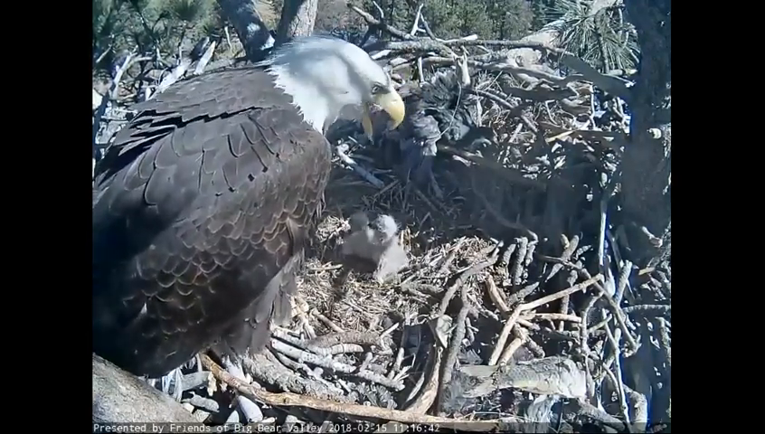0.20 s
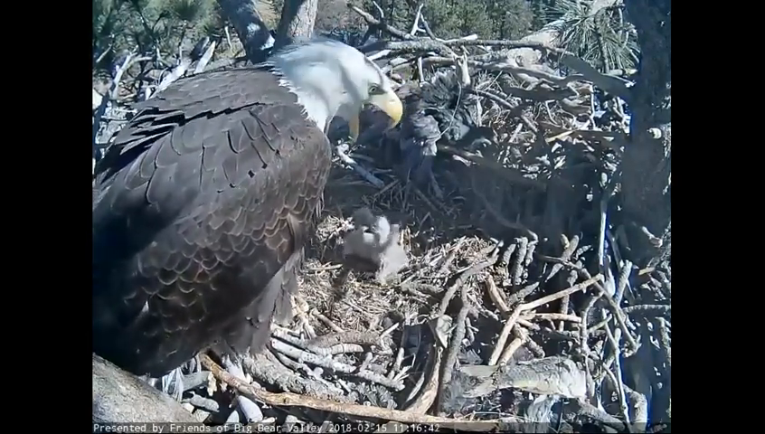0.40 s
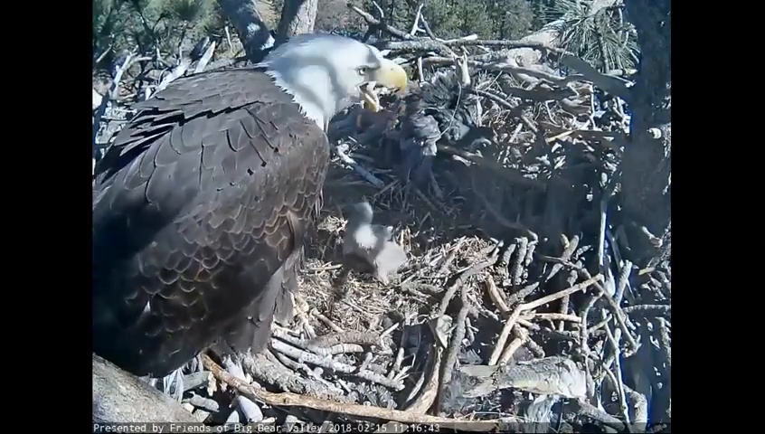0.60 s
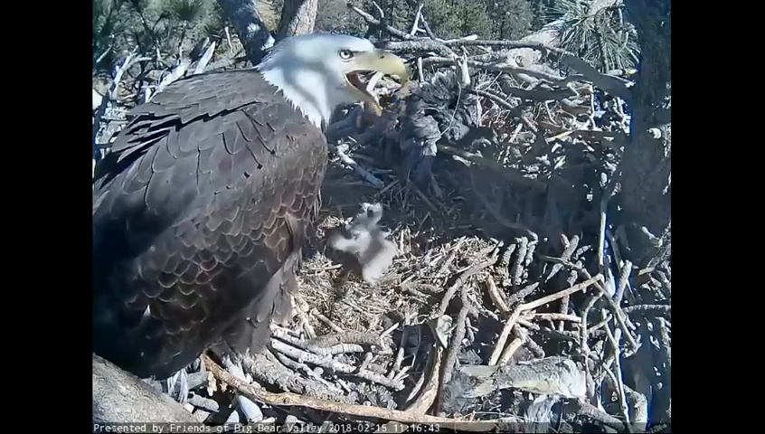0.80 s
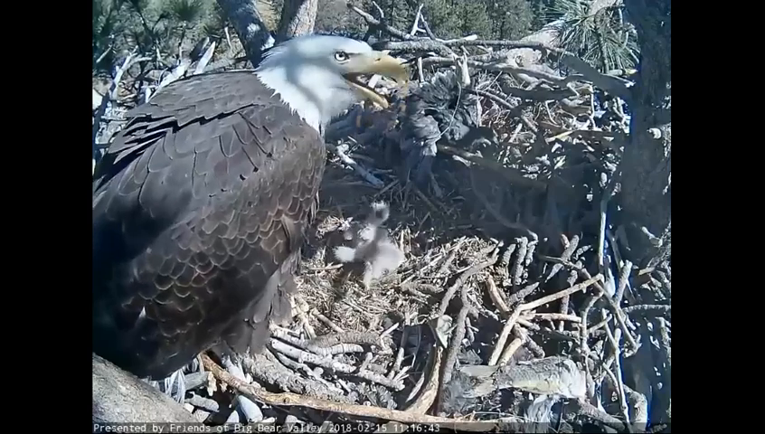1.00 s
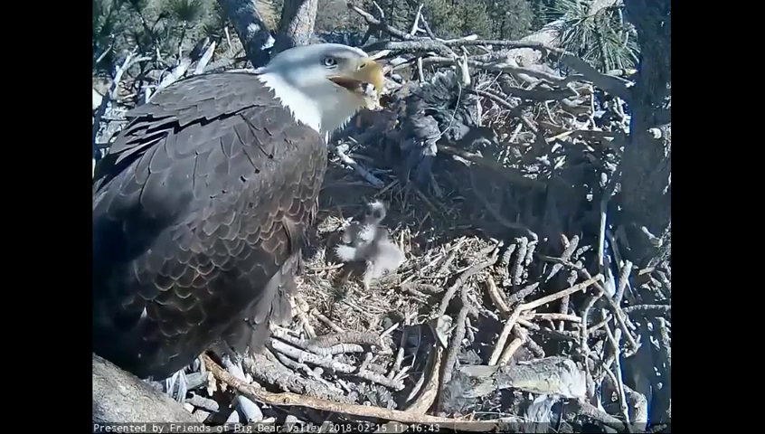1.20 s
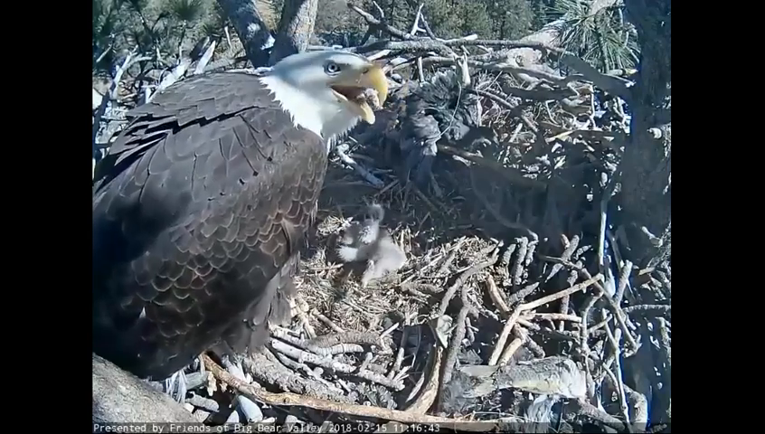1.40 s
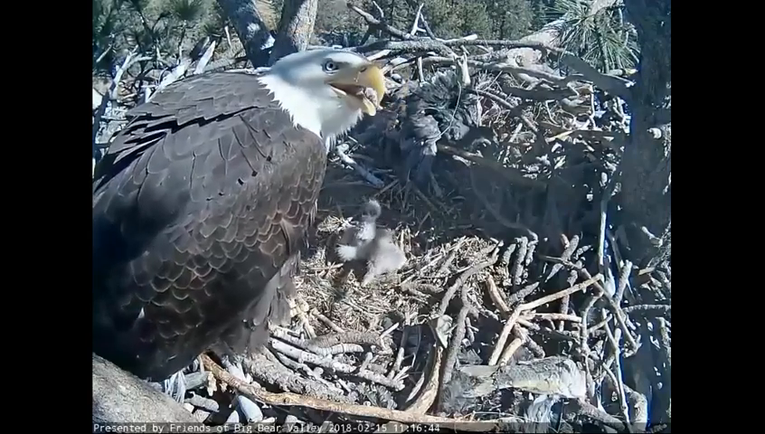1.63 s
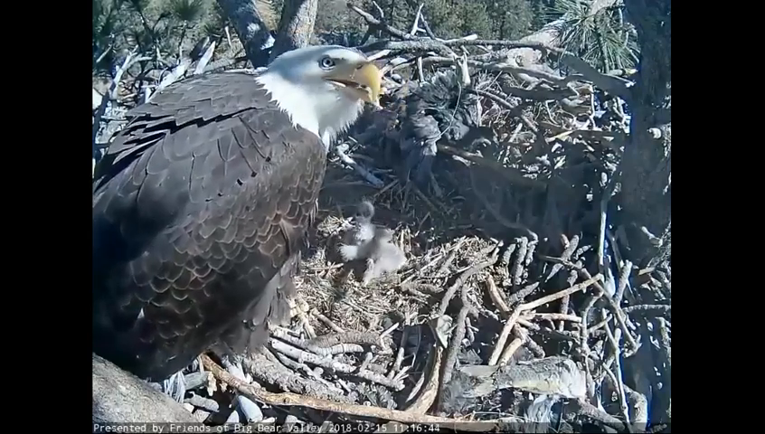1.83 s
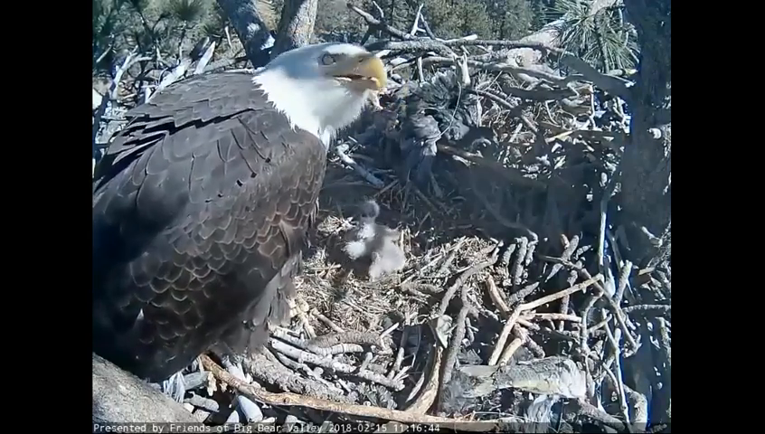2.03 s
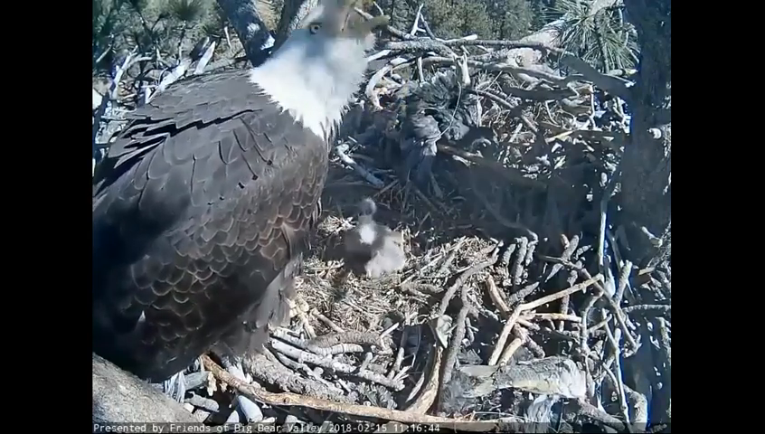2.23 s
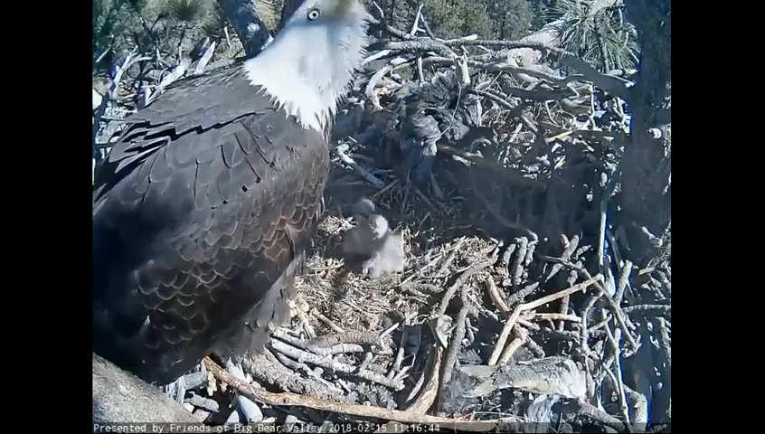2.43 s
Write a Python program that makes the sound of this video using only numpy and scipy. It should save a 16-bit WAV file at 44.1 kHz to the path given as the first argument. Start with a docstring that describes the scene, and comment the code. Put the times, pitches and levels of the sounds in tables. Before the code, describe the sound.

Two eagles call at close range, sharp chitter notes and rising quavering whistles, slightly distorted

```python
"""A forest nest, outdoors: two eagles call close to a narrow-band microphone over rumbling, hissing air.
One holds two long trembling whistles (bent sines with an octave and undertones); the other chitters
short notes (overtone stacks in a sliding band) over and between them. Twigs rustle and thump near the end
(filtered snaps, damped pulses). Blurred noise tails give a near echo and a faint long forest echo.
The loud calls drive a limiter and clip."""
import sys
import numpy as np
from scipy import signal
from scipy.fft import rfft, irfft
from scipy.io import wavfile
from scipy.ndimage import uniform_filter1d, map_coordinates

SR = 44100
rng = np.random.default_rng(int(sys.argv[2]) if len(sys.argv) > 2 else 0)


def to_wav(s):
    """Save 16-bit WAV."""
    ch = np.atleast_2d(s).T  # columns
    pcm = np.round(np.clip(ch, -1, 1) * 32767)  # PCM
    wavfile.write(sys.argv[1], SR, pcm.astype(np.int16))


N = 110250
FOREST_T60_S = 2


def gain_of(db):
    """dB to amplitude gain."""
    return 10 ** (np.asarray(db) / 20)


def evened(x):
    """Scales to rms 1."""
    return x / np.sqrt(np.mean(x ** 2) + 1e-20)


def add(mix, start_s, sound):
    """Mixes a sound in at a time, cut at the end of the mix."""
    part = mix[round(start_s * SR):][:len(sound)]
    part += sound[:len(part)]


def slow_noise(size, cutoff_hz):
    """Low-passed noise of about rms 1; the filter's start-up is dropped."""
    pad = SR // 10
    lowpass = signal.butter(2, cutoff_hz, fs=SR, output="sos")
    return evened(signal.sosfilt(lowpass, rng.standard_normal(size + pad)))[pad:]


def air():
    """Wind rumble and hiss: coloured noise whose spectrum drifts in patches of time and frequency."""
    # colour of the air: hz, relative_level_db
    colour_table = [(12, -20.5), (24, 0), (45, -13), (129, -20.5), (646, -28.5), (1650, -43.5), (1980, -40),
                    (2230, -42.5), (3640, -45), (4000, -75), (5200, -102)]
    level_db, patch_db = -49.5, 0.87
    frames, bin_hz = N // 256 + 5, np.fft.rfftfreq(1024, 1 / SR)
    real, imag, patches = rng.standard_normal((frames, 513, 3)).T
    patches = uniform_filter1d(patches, 8, 0)  # across frequency
    patches = evened(uniform_filter1d(patches, 10, 1))  # across time
    hz, colour_db = np.transpose(colour_table)
    bin_db = np.interp(np.log(bin_hz + 1), np.log(hz + 1), colour_db)
    spectra = (real + 1j * imag) * gain_of(bin_db[:, None] + patch_db * patches)
    noise = signal.istft(spectra, nperseg=1024, noverlap=768)[1][:N]
    return gain_of(level_db) * evened(noise)


def earlier_echo():
    """Dying echo of a whistle that has just ended: a tone blurred by two slow random quadratures."""
    pitch_hz, start_db = 1995, -52
    t = np.arange(N) / SR
    turns = 2 * np.pi * pitch_hz * t
    fade = gain_of(start_db - 30 * t / FOREST_T60_S)  # half the forest echo's dB rate
    return fade * (slow_noise(N, 41) * np.sin(turns) + slow_noise(N, 35) * np.cos(turns))


def chitter_note(start_s, length_s, level_db, first_hz, last_hz, arch_hz, first_band_hz, last_band_hz,
                 width_hz, throb, throbs_per_s, peak_share):
    """Overtones, of which the throat favours one sliding band; swells, fades and may dip in throbs."""
    flutter_hz, flutter, rasp_hz, rasp, jitter = 70, 0.17, 700, 0.11, 0.005
    swell_power, fade_power, dip_power = 0.76, 0.9, 8
    t = np.arange(0, length_s, 1 / SR)
    u, throb = t / length_s, np.clip(throb, 0, 1)
    pitch_hz = first_hz + (last_hz - first_hz) * u + arch_hz * np.sin(np.pi * u)
    band_hz = first_band_hz + (last_band_hz - first_band_hz) * u ** 0.73
    jittered_hz = pitch_hz * (1 + jitter * slow_noise(len(t), flutter_hz))
    turns = 2 * np.pi * np.cumsum(jittered_hz) / SR
    voice = np.zeros(len(t))
    for k in range(1, 8):
        weight = 1 / (1 + ((k * pitch_hz - band_hz) / width_hz) ** 2) ** 2
        shake = 1 + flutter * slow_noise(len(t), flutter_hz) + rasp * slow_noise(len(t), rasp_hz)
        voice += weight * shake * np.sin(k * turns)
    dips = 1 - throb * abs(np.cos(np.pi * throbs_per_s * t)) ** dip_power
    swell = np.sin(np.pi / 2 * np.clip(u / peak_share, 0, 1))
    fade = np.sin(np.pi / 2 * np.clip((1 - u) / (1 - peak_share), 0, 1))
    shape = swell ** swell_power * fade ** fade_power
    return gain_of(level_db) * shape * dips * evened(voice)


def chitter():
    """One bird's short notes."""
    # start_s, length_s, level_db, first_pitch_hz, last_pitch_hz, arch_hz, first_band_hz, last_band_hz,
    # band_width_hz, throb_depth (0-1), throbs_per_s, peak_share (of the length)
    notes = [(0.192, 0.02, -33.5, 578, 607, 0.07, 1400, 2100, 1514, 0.15, 85, 0.33),
             (.196, 0.092, -38, 622, 675, 0.1, 3096, 3300, 410, 0.65, 50, 0.23),
             (0.197, 0.039, -35.5, 1353, 1350, 3, 1390, 1340, 385, .1, 45, 0.27),
             (0.22, 0.055, -23, 596.8, 559.6, 1.7, 2230, 2630, 394, 0.9, 62, 0.16),
             (0.264, 0.034, -22.5, 632, 590, 3, 2370, 2940, 400, 0, 40, 0.36),
             (0.284, 0.08, -5, 727.8, 695, 36, 2970, 3110, 299, .05, 93, 0.13),
             (.388, 0.062, -3.5, 758.8, 742, 14, 2910, 3020, 291, .05, 93, 0.091),
             (0.448, 0.056, -29, 522, 523.6, 3, 2850, 2000, 606, .4, 80, .3),
             (0.483, 0.055, -3, 741.5, 713.4, 23, 2950, 2710, 314, .05, 35, 0.16),
             (0.53, 0.1, -21.5, 521, 528.6, 2.7, 3054, 2400, 600, 0.2, 52, 0.38),
             (0.588, 0.046, -4.5, 712, 740.7, 12, 2965, 3030, 304, 0, 45, 0.1),
             (0.631, 0.065, -26.5, 528.7, 542, 1.6, 2970, 2600, 590, 0.2, 130, 0.086),
             (0.719, 0.05, -9, 747.6, 698.7, 6.6, 3010, 2950, 361, .2, 210, 0.21),
             (.842, 0.044, -10.5, 761, 704, 0.094, 2274, 3300, 450, .85, 29.5, 0.46),
             (0.957, 0.0097, -43.5, 619, 616.5, 1.02, 1530, 2000, 800, 0.7, 102, .3),
             (0.97, 0.049, -8, 750.5, 696, 0.14, 2820, 2850, 336, .8, 26, 0.58),
             (1.132, 0.049, -15.5, 757.3, 702, 0.1, 3580, 2330, 695, 0.6, 95, 0.59),
             (1.291, 0.013, -43.5, 676, 610, 1.8, 1440, 1300, 492, 0.5, 74, 0.26),
             (1.305, 0.038, -13.5, 746.4, 679.6, 0.1, 3208, 1966, 401, 0.3, 69, 0.54),
             (1.439, 0.064, -30, 606, 647, 3.4, 2200, 4800, 2585, 0.3, 73, 0.61),
             (1.602, 0.021, -26, 577, 469, 4.7, 1378, 1620, 800, 0.29, 36, 0.57),
             (1.609, 0.12, -26.5, 532.5, 503, 1.3, 2955, 2830, 600, .7, 110, 0.17),
             (2.178, 0.015, -31, 824, 812, 2.6, 3300, 3300, 291, 0.1, 60, 0.48),
             (2.191, 0.051, -17, 657, 724, 2.8, 2660, 3010, 302, 0.9, 57.8, 0.32),
             (2.226, 0.028, -22, 841, 855, 4, 3450, 3450, 300, 0.7, 86, 0.44),
             (2.238, 0.022, -38, 760, 630, 4, 1460, 1400, 400, .5, 90, 0.34),
             (2.406, 0.094, -41.5, 664, 693, 3.9, 2860, 2750, 294, 0.6, 63, 0.45)]
    out = np.zeros(N)
    for row in notes:
        add(out, row[0], chitter_note(*row))
    return out


def whistle(rows):
    """Trembling tone; its octave swells at the bottom of each tremble, and undertones grow when loud."""
    # brief breaks into thirds of the pitch: peak_s, level_db
    breaks = [(1.84, -36), (1.878, -29), (1.94, -15)]
    break_s, half_db, half_growth = 0.011, -31.5, 1  # half-pitch undertone, db per db of level
    tremble_per_s, tremble_db, wander_hz, breath_db = 44, 0.5, 3.4, -27.5
    octave_db, octave_swing_db, octave_wander_db = -3, 2, 1.5
    s, hz, db, depth_hz = np.transpose(rows)
    t = np.arange(s[0], s[-1], 1 / SR)
    level_db, depth = np.interp(t, s, db), np.interp(t, s, depth_hz)
    depth_share = depth / depth.max()
    shake = np.sin(2 * np.pi * tremble_per_s * (t - s[0]))
    pitch_hz = np.interp(t, s, hz) + depth * shake + wander_hz * slow_noise(len(t), 53)
    turns = 2 * np.pi * np.cumsum(pitch_hz) / SR
    breath = gain_of(breath_db) * slow_noise(len(t), 770)
    swing_db = octave_db - octave_swing_db * shake + octave_wander_db * slow_noise(len(t), 25)
    octave = gain_of(swing_db) * depth_share ** 1.1
    half = gain_of(half_db + half_growth * (level_db - db.max())) * (1 + slow_noise(len(t), 80))
    thirds = sum(gain_of(d) * np.exp(-((t - at) / break_s) ** 2) for at, d in breaks)
    # phase modulation makes the undertones
    bent = turns + breath + 2 * half * np.cos(turns / 2)
    bent += 2 * thirds * (np.cos(turns / 3) + np.cos(2 * turns / 3))
    tone = np.sin(bent) + octave * np.cos(2 * bent)
    return np.sqrt(2) * gain_of(level_db + tremble_db * shake * depth_share) * tone


def whistles():
    """The other bird's two long whistles."""
    # breakpoints per whistle: time_s, pitch_hz, level_db, tremble_depth_hz
    calls = [
        [(.265, 1894, -61.5, 25), (.29, 1877, -25, 49), (.36, 1888, -23.5, 38), (.46, 1930, -18, 26),
         (.56, 1918, -20, 16), (.655, 1951, -15, 7.1), (.7, 1972, -13, 5.6), (.78, 1994, -8, 8.7),
         (.815, 2063, -10, 2), (.835, 2020, -30.5, 2.1), (.885, 1787, -28, 2.3)],
        [(1.385, 1913, -57, 45), (1.4, 1848, -23.5, 37), (1.52, 1894, -21.5, 42.5), (1.62, 1915, -19, 22),
         (1.68, 1939, -16, 9.9), (1.712, 1978, -12.5, 5.3), (1.8, 1993, -7, 1.4), (1.87, 2028, -12, 4.1),
         (1.918, 2004, -4.5, 6.1), (1.93, 1870, -23.5, 5.2), (1.95, 1694, -52.5, 3)],
    ]
    out = np.zeros(N)
    for rows in calls:
        add(out, rows[0][0], whistle(rows))
    return out


def twigs():
    """Twigs: a spray of tiny band-passed snaps and a few dull knocks, each with a short damped tick."""
    # start_s, length_s, level_db
    rustles = [(2.262, 0.059, -36.5)]
    # start_s, level_db
    thumps = [(2.261, -29), (2.301, -24), (2.316, -27), (2.33, -27.5)]
    snaps_per_s, thump_ms, tick_db, tick_hz, tick_ms = 600, 1.5, -7, 1500, 2.4
    out = np.zeros(N)
    bandpass = signal.butter(2, [2300, 3700], "band", fs=SR, output="sos")
    for start_s, length_s, level_db in rustles:
        t = np.arange(0, length_s, 1 / SR)
        snaps = (rng.random(len(t)) < snaps_per_s / SR) * rng.standard_normal(len(t))
        snaps = evened(signal.sosfilt(bandpass, snaps))
        add(out, start_s, gain_of(level_db) * snaps * np.sin(np.pi * t / length_s))
    ms = np.arange(900) / SR * 1000
    u = ms / thump_ms
    knock = np.e * u * (1 - u / 3) * np.exp(-u)
    tick = gain_of(tick_db) * np.sin(2 * np.pi * tick_hz * ms / 1000) * np.exp(-ms / tick_ms)
    for start_s, level_db in thumps:
        add(out, start_s, gain_of(level_db) * (knock + tick))
    return out


def echo(x, near_db, far_db):
    """Adds a short blur from nest and trunk and a long forest tail: decaying noise as echo taps."""
    near_t60_s, far_rise_s = 0.091, 0.14
    t = np.arange(2 * SR) / SR
    near = rng.standard_normal(len(t)) * gain_of(-60 * t / near_t60_s)
    far = rng.standard_normal(len(t)) * gain_of(-60 * t / FOREST_T60_S)
    far *= np.clip(t / far_rise_s, 0, 1)
    taps = gain_of(near_db) * near / np.linalg.norm(near) + gain_of(far_db) * far / np.linalg.norm(far)
    return x + signal.fftconvolve(x, taps)[:N]


def scene():
    """Both birds and the twigs with their echoes, over the air."""
    background = air() + earlier_echo()
    near_nest = echo(chitter() + twigs(), near_db=-7, far_db=-22.5)
    whistler = echo(whistles(), near_db=-19, far_db=-38)
    return (background + near_nest + whistler)[None]


def limiter(x):
    """Instant-attack limiter: holds power peaks, lets them fall steadily, removes most of the excess."""
    limit_db, limit_share, recover_db_per_s = -12, 0.92, 877
    power_db = 10 * np.log10(abs(uniform_filter1d(x ** 2, 90)) + 1e-12)
    fall_db = np.arange(N) * recover_db_per_s / SR
    held_db = np.maximum.accumulate(power_db + fall_db) - fall_db
    over_db = np.maximum(held_db - limit_db, 0)
    return x / gain_of(limit_share * uniform_filter1d(over_db, 40))


def narrow_band(x):
    """Samples at a low rate, folding overtones back, then dulls the treble and cuts above a band edge."""
    narrow_rate_hz, treble_db_per_khz = 16000, -3.5
    edge_hz, edge_width_hz, edge_drop_db, skirt_db_per_khz = 3673, 300, -34.5, -20
    low = map_coordinates(x, [np.arange(0, N + 6, SR / narrow_rate_hz)], order=3, mode="nearest")
    spectrum = rfft(low)
    hz = np.linspace(0, narrow_rate_hz / 2, len(spectrum))
    treble_db = treble_db_per_khz * np.clip(hz / 1000 - 2, 0, 2)
    edge_db = edge_drop_db * np.clip((hz - edge_hz) / edge_width_hz, 0, 1) ** 2
    skirt_db = skirt_db_per_khz * np.maximum(hz - edge_hz, 0) / 1000
    size = round(len(low) * SR / narrow_rate_hz)
    wide = irfft(spectrum * gain_of(treble_db + edge_db + skirt_db), size)
    return wide[:N] * size / len(low)


def fuzz_and_clip(x):
    """Adds fuzz and an offset that follow the loudness, then clips the upper side at a wavering ceiling."""
    ceiling, ceiling_waver, waver_hz = 0.36, 0.03, 90
    fuzz_db, fuzz_hz, hiss_db = -45.5, 4350, -99
    offset, offset_loud, sag_s = 0.01, 0.032, 0.23
    wobble_db, loud_wobble, wobble_hz = -43.5, 0.65, 27
    power = abs(uniform_filter1d(x ** 2, 800)) / ceiling ** 2 * 2  # 1 = sine that peaks at the ceiling
    lowpass = signal.butter(8, fuzz_hz, fs=SR, output="sos")
    fuzz = signal.sosfilt(lowpass, rng.standard_normal(N))
    x = x + gain_of(fuzz_db) * np.sqrt(power) * fuzz
    # half of a loud passage's offset drains away
    keep = np.exp(-1 / (sag_s * SR))
    push = power ** 3 - 0.5 * signal.lfilter([1 - keep], [1, -keep], power ** 3)
    wobble = gain_of(wobble_db) * (1 + loud_wobble * power) * slow_noise(N, wobble_hz)
    drift = offset + offset_loud * push + wobble
    top = ceiling * (1 + ceiling_waver * slow_noise(N, waver_hz))
    return np.minimum(x + drift, top) + gain_of(hiss_db) * rng.standard_normal(N)


def record(dry):
    """Microphone chain: two-sided overload, limiter, narrow band, fuzz, one-sided clip, low-pass."""
    overload, lowpass_hz = 0.49, 16000
    x = limiter(np.clip(dry[0], -overload, overload))
    x = fuzz_and_clip(narrow_band(x))
    taps = signal.firwin(511, lowpass_hz, window=("kaiser", 9), fs=SR)
    return signal.oaconvolve(x[None], taps[None], "same")


dry = scene()
out = record(dry)
to_wav(out)
```